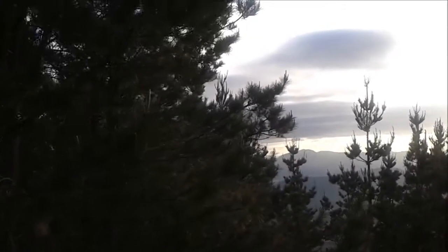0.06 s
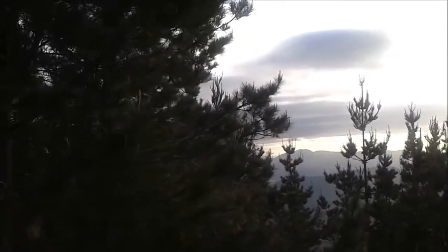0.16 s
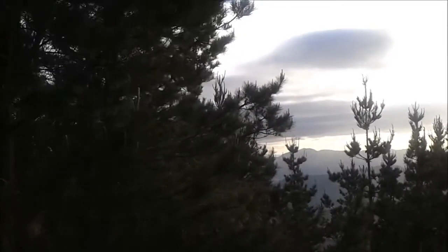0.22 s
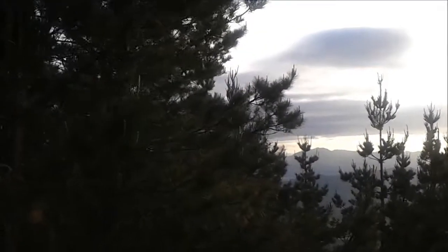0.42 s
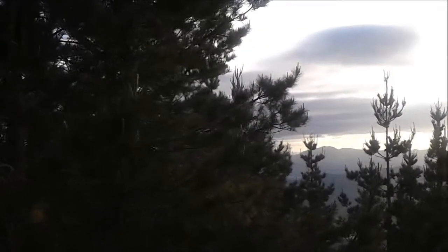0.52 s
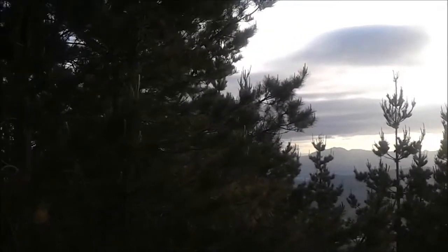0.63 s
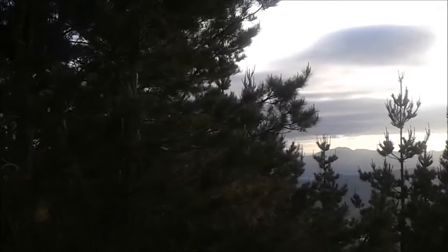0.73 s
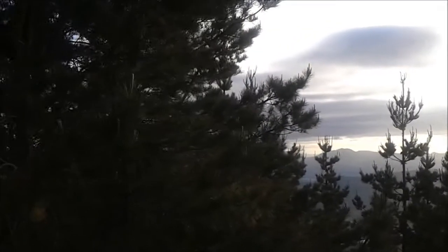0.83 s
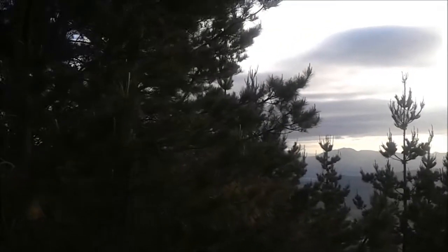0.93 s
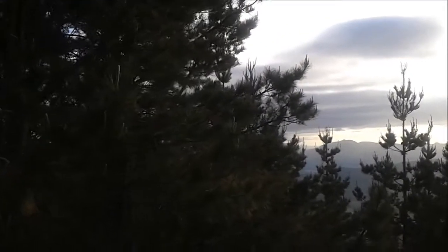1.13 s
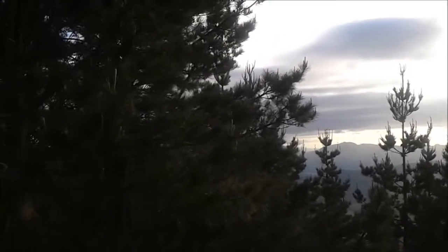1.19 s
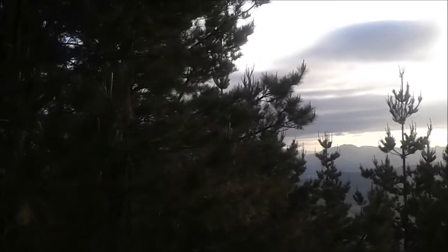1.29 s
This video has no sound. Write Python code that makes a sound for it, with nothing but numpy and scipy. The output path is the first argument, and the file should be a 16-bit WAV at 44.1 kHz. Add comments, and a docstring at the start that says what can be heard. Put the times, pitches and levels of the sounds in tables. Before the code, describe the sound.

A cuckoo calls once among pines: a short arched note at 0.2 seconds, then a longer, lower, level one from 0.5 to 0.7, both pure and faintly echoing. A soft, dry rustle with a few ticks swells close by during the call. From 0.7 to 1.3 seconds a distant small bird warbles faint gliding whistles. Open-air hush, light hiss and a very faint low drone lie underneath throughout.

```python
"""A cuckoo calls once from a pine wood: a short arched note, then a longer, lower, nearly level one,
both almost pure tones with a faint echo from the trees. A dry rustle of tiny crackles and a few
ticks swells close by during the call. Far off, a small bird warbles in short gliding whistles.
Under them lie the hush of open air, a faint distant drone and microphone hiss."""
import sys
import numpy as np
from scipy import signal
from scipy.fft import rfft, irfft
from scipy.io import wavfile

SR = 44100
rng = np.random.default_rng(int(sys.argv[2]) if len(sys.argv) > 2 else 0)


def materialize(psi):
    """Save the field psi as 16-bit PCM at rate SR to the path in sys.argv[1].

    A 1-D psi becomes a single channel; in a 2-D psi each row is a channel.
    """
    bounded = np.clip(np.atleast_2d(psi).T, -1, 1)
    quanta = np.round(bounded * 32767).astype(np.int16)
    wavfile.write(sys.argv[1], SR, quanta)


N = 59535
T = np.arange(N) / SR


def from_db(db):
    """Decibels to gain."""
    return 10 ** (np.asarray(db) / 20)


def rms_one(x):
    """Scale to rms 1."""
    return x / np.sqrt(np.mean(x ** 2) + 1e-20)


def curve(rows):
    """Join (time [s], value) points by straight lines."""
    return np.interp(T, *np.transpose(rows))


def drift(rate_hz):
    """Low-passed random wander, rms 1."""
    hop, warmup = 40, 2000
    pole = np.exp(-2 * np.pi * rate_hz * hop / SR)
    noise = rng.standard_normal(N // hop + warmup + 2)
    slow = signal.lfilter([1], [1, -2 * pole, pole * pole], noise)[warmup:]
    return np.interp(np.arange(N) / hop, np.arange(len(slow)), rms_one(slow))


def colour(x, spectrum):
    """Filter by (frequency [Hz], gain [dB]) points; rms 1."""
    hz, db = np.transpose(spectrum)
    bins_hz = np.maximum(np.fft.rfftfreq(N, 1 / SR), 1)
    gain = from_db(np.interp(np.log(bins_hz), np.log(hz), db))
    return rms_one(irfft(rfft(x) * gain, N))


def tone(hz):
    """Sine on a pitch curve, rms 1."""
    return np.sqrt(2) * np.sin(2 * np.pi * np.cumsum(hz) / SR)


def tree_scatter(x):
    """Diffuse echo off the trees: builds up, dies away; same rms as x."""
    t60_s, build_s = 0.57, 0.062
    tail = rng.standard_normal(N) * from_db(-60 * T / t60_s) * np.minimum(T / build_s, 1) ** 2
    return np.std(x) * rms_one(signal.fftconvolve(x, tail)[:N])


def cuckoo():
    """Two hooted, near-pure notes, each loudest at its middle, echoing in the wood."""
    # first note's arch (time [s], pitch [Hz])
    arch = [(.228, 521), (.241, 614), (.26, 653), (.295, 635.4), (.308, 624), (.322, 566)]
    # notes (start [s], length [s], level [dB], attack [s], release [s], echo re note [dB])
    notes = [(0.226, 0.0995, -33.5, 0.029, 0.009, -22), (.507, 0.171, -33.7, 0.024, 0.018, -23)]
    low_hz, rise_hz_per_s = 532.5, 50
    sag_db, shimmer_db, jitter = 7.5, 0.65, 0.0019
    pitches_hz = [curve(arch), low_hz + rise_hz_per_s * (T - notes[1][0])]
    out = np.zeros(N)
    for (start_s, length_s, db, attack_s, release_s, echo_db), hz in zip(notes, pitches_hz):
        age_s = T - start_s
        fade_in = np.clip(age_s / attack_s, 0, 1)
        fade_out = np.sin(np.pi / 2 * np.clip((length_s - age_s) / release_s, 0, 1))
        swell_db = -sag_db * np.clip(2 * age_s / length_s - 1, -1, 1) ** 2
        hoot = tone(hz * (1 + jitter * drift(67)))
        note = fade_in * fade_out * from_db(db + swell_db + shimmer_db * drift(40)) * hoot
        out += note + from_db(echo_db) * tree_scatter(note)
    return out


def rustle():
    """Dense tiny crackles in soft scuffing noise."""
    # spectrum (frequency [Hz], density [dB])
    spectrum = [(300, -7.5), (700, 2.5), (1100, 5), (1750, 1.5), (2350, -6), (3200, -3.5), (4300, -1.5),
                (5300, -10.5), (6500, -14), (9000, -14), (15000, -53)]
    # envelope (time [s], level [dB])
    envelope = [(0, -65.5), (.22, -63.5), (.247, -49), (.28, -53.5), (.31, -54.5), (.35, -52), (.39, -56),
                (.415, -56.5), (.45, -58), (.49, -53.5), (.53, -48), (.59, -55), (.65, -57.5), (.86, -62),
                (.94, -58), (1.05, -62), (1.17, -64.5), (1.31, -61)]
    crackles_per_s, power_share, spread_db = 900, 0.46, 2
    sizes = from_db(spread_db * np.minimum(rng.exponential(1, N), 3))
    signs = rng.choice([-1, 1], N)
    crackles = rms_one(sizes * signs * (rng.random(N) < crackles_per_s / SR))
    mix = np.sqrt(power_share) * crackles + np.sqrt(1 - power_share) * rng.standard_normal(N)
    return from_db(curve(envelope)) * colour(mix, spectrum)


def ticks():
    """Dry ticks and scuffs: decaying noise bursts, each in its own band."""
    # bursts (start [s], onset level [dB], low edge [Hz], high edge [Hz], decay [s])
    bursts = [(0.2462, -47, 790, 4700, 0.0045), (.2568, -43, 3070, 4480, 0.0028),
              (0.3303, -46, 810, 4370, 0.0013), (0.3597, -44, 990, 5540, 0.00047),
              (0.414, -48.5, 895, 2030, 0.003), (0.43, -48, 890, 1900, 0.0018),
              (0.576, -40, 1050, 1750, 0.0024), (0.575, -48.5, 1940, 5000, 0.0038),
              (0.6759, -41.5, 1190, 8200, 0.00078), (0.906, -55, 950, 2450, 0.026),
              (1.305, -51, 1000, 4130, 0.0021)]
    out = np.zeros(N)
    for start_s, db, low_hz, high_hz, decay_s in bursts:
        band = signal.butter(3, [low_hz, high_hz], "band", fs=SR, output="sos")
        burst = rng.choice([-1, 1], N) * (T >= start_s) * np.exp(-np.abs(T - start_s) / decay_s)
        out += from_db(db) * np.std(burst) * rms_one(signal.sosfilt(band, burst + 1e-18))
    return out


def small_bird():
    """Short gliding whistles, blurred by the trees."""
    # chirps (centre [s], length [s], pitch [Hz], glide [Hz/s], level [dB])
    chirps = [(0.71, 0.028, 3190, -2000, -67), (0.735, .03, 2680, -2000, -62.5),
              (0.811, .03, 3000, 8996.5, -64.5), (0.835, 0.027, 2635, 3015, -62.5),
              (0.97, 0.028, 3950, 5014, -63), (0.989, 0.02, 3524, -28000, -61.5),
              (1.02, .02, 3013, 7993, -59.5), (1.031, 0.016, 3360, -6000, -61),
              (1.04, 0.021, 2580, -3000, -65.5), (1.206, 0.016, 2550, -1, -62.5),
              (1.222, 0.022, 2880, 6014, -60.5), (1.242, 0.026, 3370, 12004, -61.5),
              (1.255, .02, 3830, 14000, -70), (1.294, .022, 3630, -20000, -63.5)]
    echo_db, jitter = -7.5, 0.0219
    out = np.zeros(N)
    for centre_s, length_s, hz, glide_hz_per_s, db in chirps:
        offset_s = np.clip(T - centre_s, -length_s / 2, length_s / 2)
        pitch_hz = (hz + glide_hz_per_s * offset_s) * (1 + jitter * drift(154))
        out += from_db(db) * np.cos(np.pi * offset_s / length_s) * tone(pitch_hz)
    return out + from_db(echo_db) * tree_scatter(out)


def open_air():
    """Soft hush: noise strongest near 600 Hz."""
    # spectrum (frequency [Hz], density [dB])
    spectrum = [(25, -13.5), (60, -5.5), (120, -7.5), (250, -1), (400, 0), (600, 4), (900, -6), (1400, -16),
                (2300, -13.5), (4200, -19), (6000, -23), (15000, -42)]
    # envelope (time [s], level [dB])
    envelope = [(0, -61), (.18, -58), (.3, -58.5), (.73, -56.5), (.82, -57.5), (1.0, -57), (1.18, -58.5),
                (1.35, -57)]
    return from_db(curve(envelope)) * colour(rng.standard_normal(N), spectrum)


def microphone_hiss():
    """Bright noise, a little louder during the call."""
    # spectrum (frequency [Hz], density [dB])
    spectrum = [(3000, -6), (6300, -10.5), (8000, -2), (12000, 0), (15500, 0.5)]
    # envelope (time [s], level [dB])
    envelope = [(0, -64.5), (.19, -65), (.26, -60), (.45, -61.5), (.6, -59), (.8, -62), (1.35, -62.5)]
    return from_db(curve(envelope)) * colour(rng.standard_normal(N), spectrum)


def distant_drone():
    """Five low, wavering tones on a common swell."""
    # partials (frequency [Hz], level [dB], swell factor [1])
    partials = [(83, -72.5, 0.2), (138, -75, 0.3), (149.3, -71, 0.74), (300.7, -74.5, 0.42),
                (448, -66.5, 1.15)]
    # swell (time [s], gain [dB])
    swell = [(0, 0.5), (.2, -7.5), (.35, 6), (.45, 4), (.59, 9.5), (.68, 2), (.82, -3), (.92, 2),
             (1.02, 3.5), (1.16, -2), (1.35, -2)]
    waver, flutter_db = 0.0095, 3
    out = np.zeros(N)
    for hz, db, swell_factor in partials:
        flutter = from_db(flutter_db * drift(2.7))
        partial = rms_one(flutter * tone(hz * (1 + waver * drift(14.2))))
        out += from_db(db + swell_factor * curve(swell)) * partial
    return out


def scene():
    """All sources, mono."""
    return (cuckoo() + small_bird() + rustle() + ticks()
            + open_air() + microphone_hiss() + distant_drone())[None]


def record(dry):
    """Steep low-pass."""
    cutoff_hz = 15800
    lowpass = signal.firwin(601, cutoff_hz, fs=SR, window="blackman")
    return signal.fftconvolve(dry, lowpass[None], mode="same")


dry = scene()
out = record(dry)
materialize(out)
```